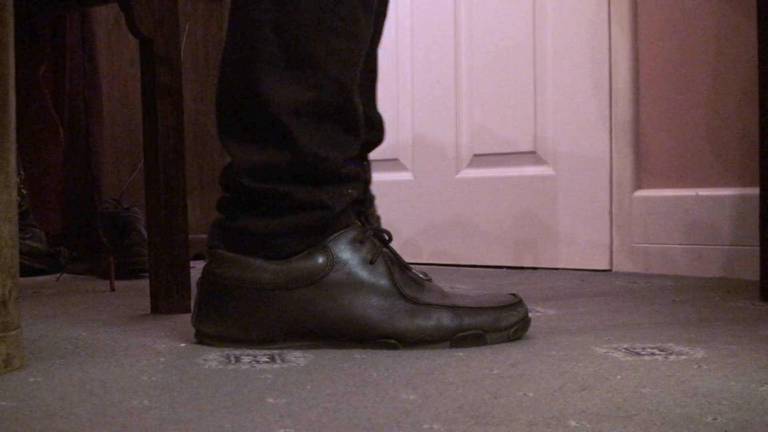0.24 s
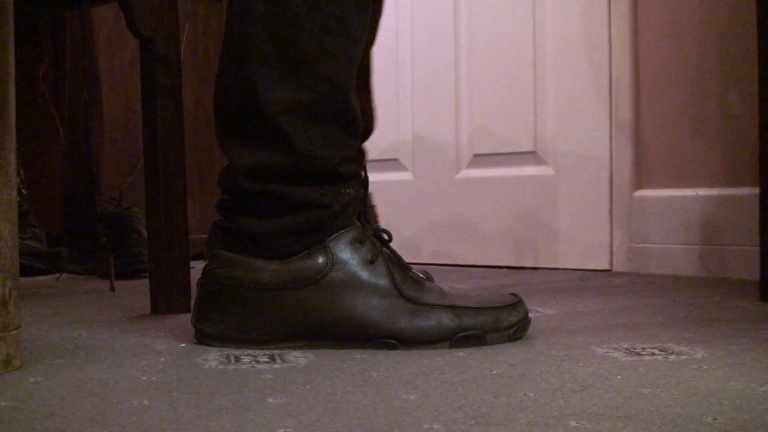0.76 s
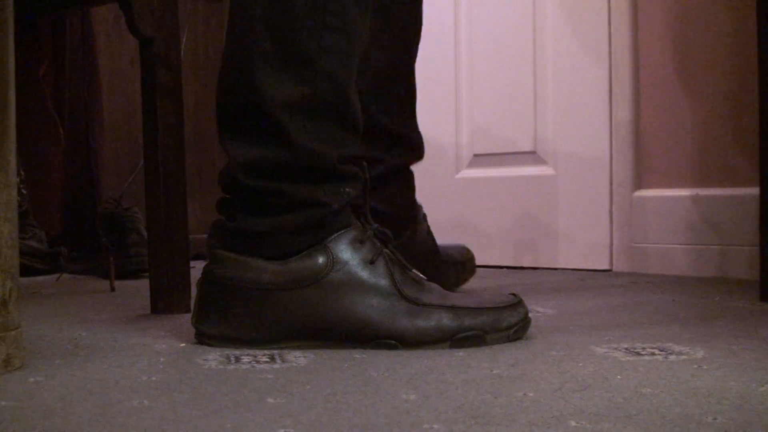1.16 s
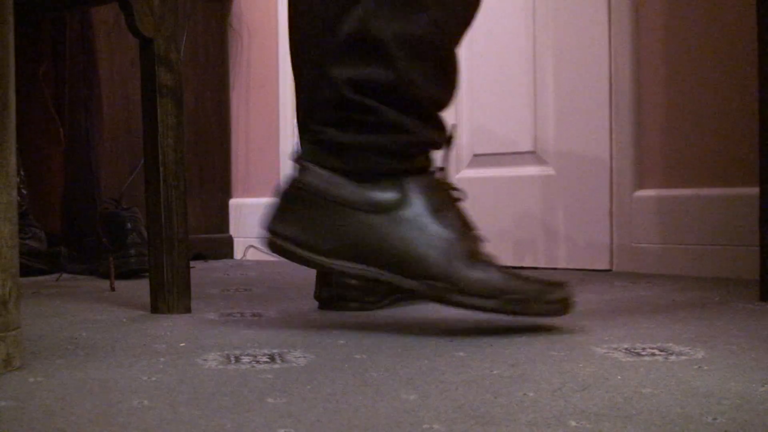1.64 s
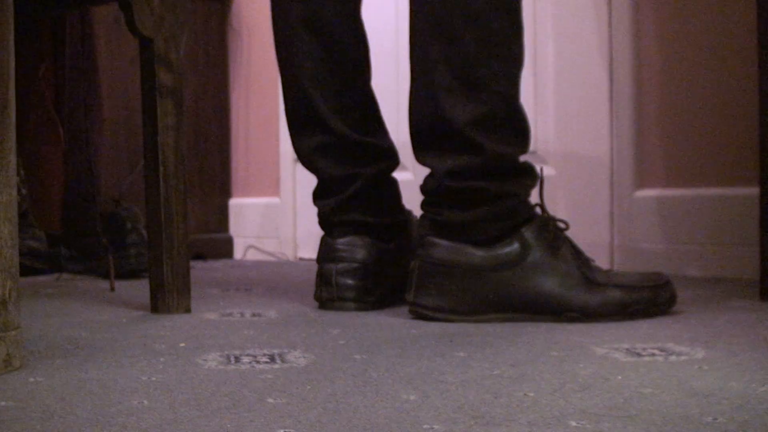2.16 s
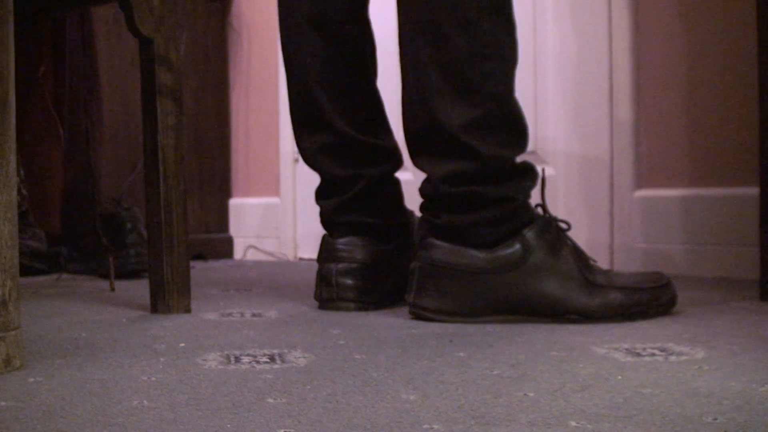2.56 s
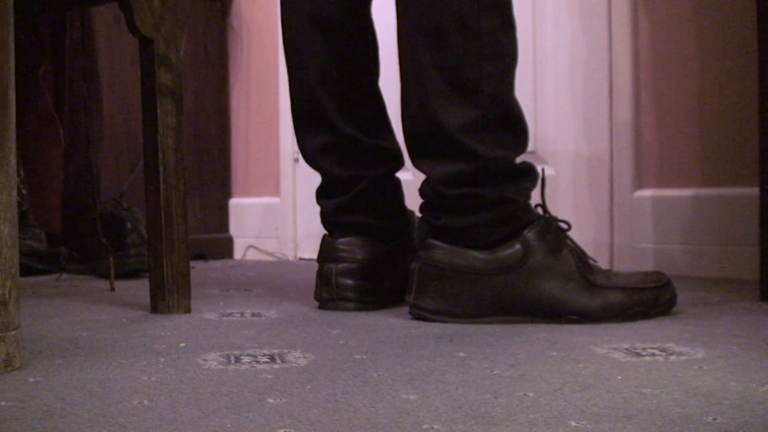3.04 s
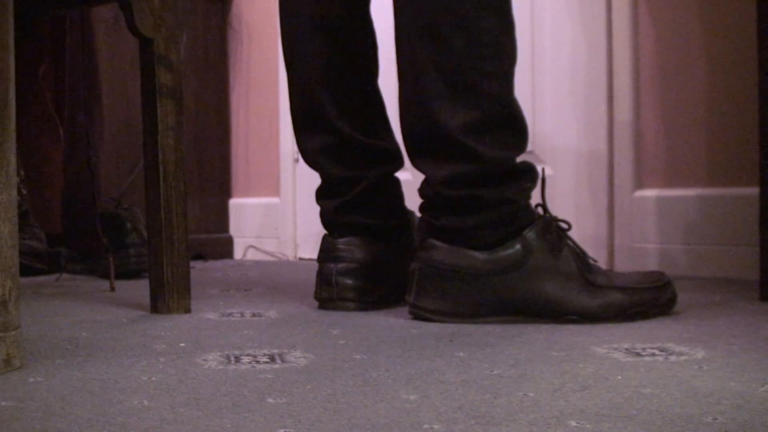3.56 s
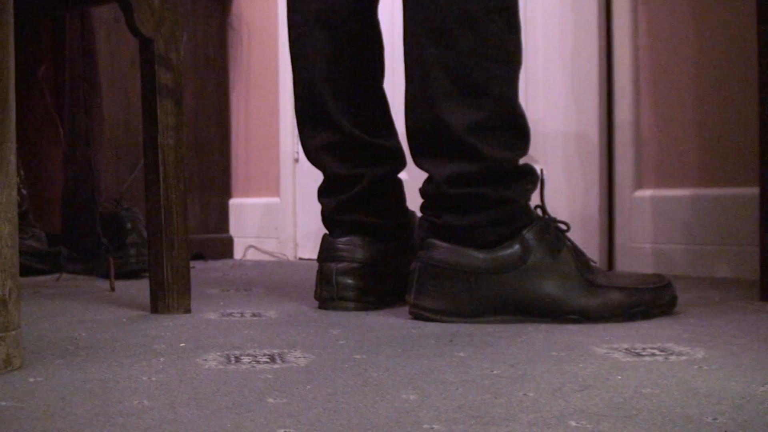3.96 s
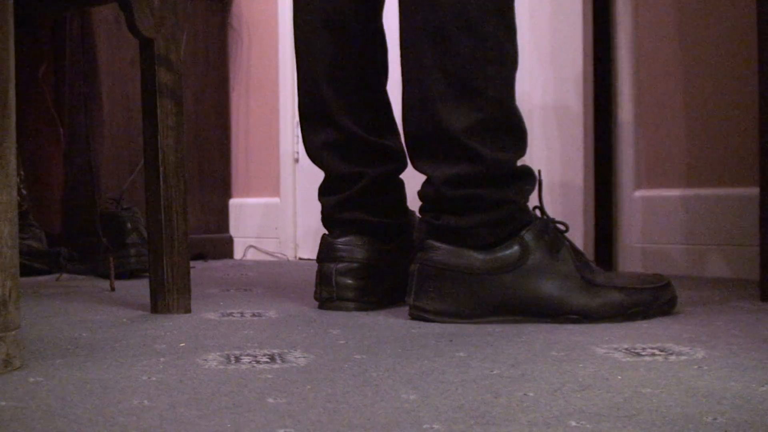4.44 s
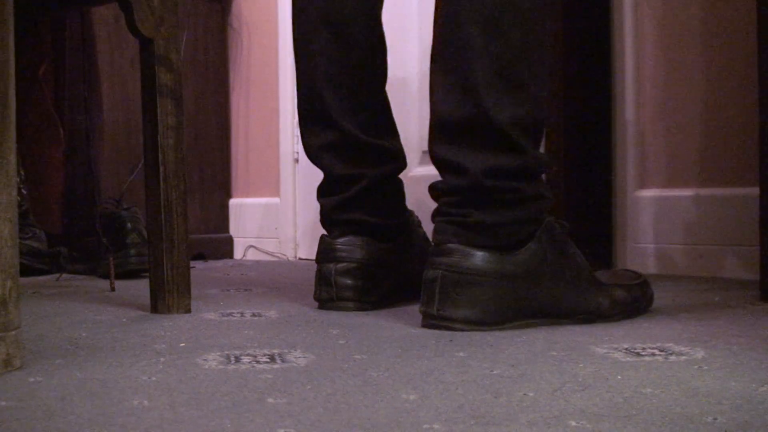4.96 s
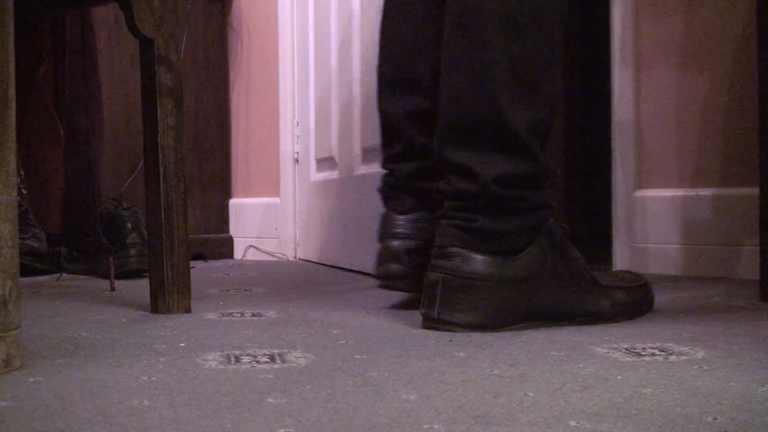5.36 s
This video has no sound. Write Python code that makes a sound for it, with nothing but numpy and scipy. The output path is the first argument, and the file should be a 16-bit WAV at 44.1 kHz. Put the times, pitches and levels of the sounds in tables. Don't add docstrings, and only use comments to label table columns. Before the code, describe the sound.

In a small carpeted room, muffled footsteps shuffle, a door handle rattles lightly, and the latch releases with a hard, hollow double knock.

```python
import sys
import numpy as np
from scipy import signal
from scipy.fft import rfft, irfft
from scipy.io import wavfile
from scipy.ndimage import uniform_filter1d

SR = 44100
rng = np.random.default_rng(int(sys.argv[2]) if len(sys.argv) > 2 else 0)


def file_out(sig):
    cols = np.atleast_2d(sig).T
    lim = np.clip(cols, -1, 1)
    pcm = np.round(lim * 32767).astype(np.int16)
    wavfile.write(sys.argv[1], SR, pcm)


def gain_from_decibels(decibels):
    exponent = np.asarray(decibels, float) / 20
    return 10 ** exponent


N = 246519

# frequency in Hz, density in dB per Hz.
AIR_COLOUR = [(12, -51), (20, -4.5), (96, -6.5), (120, -4.5), (150, -11), (222, -9.5), (367, -13.5),
              (527, -18.5), (574, -15), (642, -16.5), (1290, -23), (2080, -25), (2260, -24.5),
              (5230, -26.5), (16000, -31)]
# frequency in Hz, level in dB rms.
MOTOR_LINES = [(150.7, -67.5), (1803, -80.5), (2099, -76), (2401, -84), (3095, -81), (4199, -85.5),
               (4802, -81), (5399, -82)]
# octave centre in Hz, t60 in seconds.
ROOM_T60 = [(60, 0.42), (250, 0.42), (800, 0.34), (2500, 0.24), (6000, 0.18), (14000, 0.1)]
# frequency in Hz, level in dB.
ROOM_TILT_DB = [(20, -7.5), (400, -5.5), (1000, -6.5), (1800, -1), (21000, 1)]
AIR_DB, ROOM_DB = -57, -6.5

# strongest drag in seconds, level in dB, rise in seconds,
# fall in seconds, fibre hiss in relative dB.
SOLE_DRAGS = [(.12, -58.5, .03, 0.1, -4), (.204, -39, 0.024, 0.082, -12), (.425, -51, 0.14, 0.12, 0),
              (.622, -59.5, .16, 0.27, -4.5), (.92, -56.5, .07, 0.18, -3.5), (1.2, -58.5, 0.035, 0.34, -12),
              (1.34, -64, .03, 0.28, -6), (1.41, -55.5, .15, .15, -10), (1.48, -55, .15, 0.18, -10),
              (1.626, -60.5, 0.29, 0.021, 2.5), (1.864, -51, 0.014, 0.11, -3.5),
              (4.548, -57.5, .25, 0.13, -27), (4.7, -53.5, .01, 0.12, -5), (4.79, -50, .07, 0.15, -2),
              (4.865, -54, .2, .09, 4.5), (5.262, -64, .08, .07, 6), (5.232, -55, 0.19, 0.078, -6)]
# start in seconds, thud peak in dB, slap in relative dB, contact in ms.
FOOTFALLS = [
    (0.19, -37, -20, 3.4),
    (0.2, -31, -11.5, 4.6),
    (0.212, -43, 2, 2.1),
    (1.342, -43.5, -11, 0.93),
    (1.479, -49, -8, 2.5),
    (1.862, -40, -1.5, 2.7),
    (1.875, -53, 9.5, 1.5),
    (1.91, -44.5, -10, 3.4),
    (1.924, -43, -13, 1.2),
    (2.24, -45, -15, 1.8),
]
# frequency in Hz, density in dB per Hz.
THUD_COLOUR = [(40, -3), (90, -2), (300, 0.5), (600, 3.5), (1000, -7.5), (1500, -11), (2500, -39)]
# frequency in Hz, density in dB per Hz.
FIBRE_COLOUR = [(900, -11), (1500, 0.5), (2500, -4), (4000, -8), (6000, -19), (7500, -32)]
# start in seconds, peak in dB, frequency in Hz, t60 in seconds.
FLEXES = [(.19, -28.5, 334, 0.049), (.195, -42.5, 96.5, 0.3), (1.905, -39, 104, 0.092),
          (1.341, -41, 810, 0.024), (2.24, -46.5, 111, 0.41), (2.275, -49, 770, .15),
          (2.364, -41, 896, .03), (2.93, -44.5, 45.3, 0.37), (3.02, -48, 45, 0.51),
          (3.243, -30.5, 36, 0.17), (3.318, -43, 45, 0.19), (3.762, -42.5, 830, 0.049),
          (3.785, -45, 255, .15), (3.845, -36, 780, 0.16), (4.03, -42, 1000, .07), (3.833, -32, 910, 0.09),
          (3.905, -38, 440, 0.08), (4.051, -35, 677, .09), (4.114, -16, 557.4, 0.14),
          (4.115, -22.5, 455, 0.12), (4.262, -36, 960, .2), (4.242, -27, 781, 0.13),
          (4.236, -34.5, 429.7, .2), (4.115, -25, 112, 0.18), (4.127, -24, 203, 0.11),
          (4.236, -28, 558, .11), (4.1285, -38, 28, 0.54), (4.135, -35, 43.3, 1.17),
          (4.128, -38, 72.7, 0.59)]
DROP_DB = 30
FLOOR_BOOM_DB, FLOOR_SLOWER = -9, 1.7

# strongest rub in seconds, level in dB, rise in seconds,
# fall in seconds, rasp in relative dB.
HANDLE_RUBS = [(2.192, -49, 0.047, .45, -9), (2.366, -61, 0.016, 0.44, -15), (2.478, -51.5, 0.036, .6, -16),
               (2.7, -54.5, 1, 1.2, -7), (2.97, -54, .8, .3, 1), (3.022, -45.5, .05, .09, -14),
               (3.11, -51.5, 0.63, 0.21, 3.5), (3.38, -61.5, 0.41, 0.017, -14),
               (3.794, -54, 0.25, 0.36, -10), (3.852, -40.5, 0.15, .17, -5.5),
               (3.978, -43.5, .015, 0.071, -5), (4.064, -57.5, 0.14, .1, -22), (4.1, -39, 0.11, .025, -4)]
# frequency in Hz, density in dB per Hz.
RUSTLE_COLOUR = [(250, -1.5), (400, -3.5), (750, 2), (950, -4), (1300, -19), (1700, -40)]
# frequency in Hz, density in dB per Hz.
RASP_COLOUR = [(900, -29), (1250, 5), (1900, 2), (2500, -18), (4000, -7.5), (6000, -25), (8000, -13)]
# start in seconds, peak in dB, ring in Hz, door in relative dB.
DRY_TICKS = [(2.18, -40, 2740, -15), (2.3664, -44, 1000, -6), (2.4728, -35.5, 3610, -13),
             (2.8719, -39.5, 3030, -3.5), (2.9507, -40.5, 2420, 0.5), (2.9808, -40, 3900, -12),
             (3.0129, -31, 3080, -13), (3.019, -39, 6500, -7.5), (3.038, -30.5, 3900, -18),
             (3.0874, -41, 2520, -1), (3.083, -38, 6500, -12), (3.121, -33.5, 3200, -9),
             (3.2844, -54, 1300, 3), (3.3444, -63, 1300, -4), (3.3744, -53.5, 1280, -3),
             (3.7589, -43, 2640, -1), (3.8098, -41, 3500, -8), (3.81, -44, 5100, -14),
             (3.831, -39, 5200, -24), (3.8444, -37, 2920, -22), (3.8312, -35, 2020, -8),
             (3.918, -43, 2980, -1), (3.9419, -39, 2880, -8), (3.9752, -35, 2720, -7),
             (4.0277, -40, 3600, -3), (4.1122, -13, 2370, -32), (4.6955, -43.5, 3240, -6)]
# start in seconds, peak in dB, ring in Hz, door in relative dB.
FREE_TICKS = [
    (2.2194, -50, 1100, -6),
    (2.2794, -50.5, 3140, -1.5),
    (2.5653, -43, 3220, -9),
    (2.6344, -56, 1250, -1),
    (2.7175, -44, 3270, -1),
    (2.8784, -43.5, 3450, -4),
    (3.7844, -53, 3320, -5),
    (3.1198, -33, 7500, -5),
    (3.126, -34, 6900, -5.5),
    (4.0514, -44, 2855, 0),
]
# start in seconds, peak in dB, ring in Hz, contact in ms.
LOOSE_PARTS = [(2.185, -48, 4050, 9), (2.386, -52, 3080, 6.8), (2.477, -45, 2310, 7.2),
               (3.045, -37, 4200, 10), (3.065, -44, 4540, 17), (3.083, -44, 2420, 6.4),
               (3.135, -47, 7500, 12), (3.85, -37.5, 3300, 11), (4.037, -40, 3550, 15),
               (4.081, -40, 4360, 19), (4.697, -44, 7440, 5.4)]
# time in seconds, slip rate in Hz, level in dB.
SQUEAK_CURVES = [
    [(3.039, 2084, -50), (3.046, 2168, -34), (3.053, 2465, -33), (3.0545, 2500, -56)],
    [(3.057, 2480, -48), (3.061, 2450, -33), (3.067, 2420, -41), (3.082, 2350, -66)],
    [(4.074, 2110, -65), (4.078, 2270, -47), (4.083, 2970, -42), (4.091, 3200, -32), (4.097, 3220, -42),
     (4.105, 3250, -70)],
]
SQUEAK_BITE = [
    -3,
    -15,
    -12,
]
# multiple of slip rate, level in dB.
SLIP_OVERTONES = [(1.9, -22), (2.85, -10.5)]
PANEL_BOOM_DB, PANEL_SLOWER = -2, 1.32
TICK_MS, TICK_RING_DB, PING_MS, PING_RING_DB = 3, -17, 2, -6
RATTLE_DOOR_DB, RATTLE_RING_DB = -6, -9

# start in seconds, peak in dB, start in Hz, climb in Hz per s, length in seconds.
LEAF_SPRINGS = [
    (2.232, -45, 230, 12000, .05),
    (3.827, -28, 670, 3000, .05),
    (3.912, -43, 760, 1200, .05),
    (4.112, -8, 630, 3700, .05),
    (4.158, -21, 710, 5400, .034),
]
SPRING_RISE_S, SPRING_FADE_DB = .012, 25
LONE_MODE_ECHO = .4
# start in seconds, peak in dB, ring in Hz, contact in ms.
LETTING_GO = [(2.3138, -52, 2500, 1), (2.38, -52, 2600, 1), (2.477, -50, 7000, 1), (2.684, -52, 2200, .8),
              (2.712, -53, 2500, 1), (2.872, -48, 6700, 1.2), (2.879, -50, 7400, 1.2),
              (2.985, -50, 6500, 1.5), (3.0128, -32, 5300, 1.5), (3.815, -45, 6200, 1.5),
              (4.0351, -41, 2900, 4), (3.836, -42, 1950, 8), (4.086, -44, 6200, 8), (3.03, -44, 1300, 10),
              (3.052, -42, 4300, 8), (4.255, -36, 1300, 25), (4.2385, -20, 4500, 2), (4.23, -32, 3000, 1.5),
              (4.7718, -48, 2400, 2), (4.784, -46, 800, 2), (4.792, -46, 1100, 2), (4.803, -47, 900, 2),
              (4.813, -47, 1200, 2), (4.8345, -41, 1000, 2), (4.836, -47, 2800, 1.5)]
SNAP_DOOR_DB, SNAP_RING_DB = -14, -16
# start in seconds, peak in dB, frequency in Hz, t60 in seconds.
SMALL_PARTS = [(2.878, -51, 3270, .1), (2.728, -52, 3270, .05), (3.043, -42, 6600, .05),
               (3.049, -38, 6380, .05), (3.059, -44, 6600, .05), (3.083, -47, 6300, .05),
               (3.072, -47, 2420, .04), (3.088, -47, 2400, .03), (3.135, -42, 790, .1),
               (4.118, -29, 1450, .14), (4.113, -28, 1830, .1), (4.125, -28, 1550, .12),
               (4.12, -32, 1717, .18), (4.116, -28, 860, .1), (4.234, -32, 1270, .06),
               (4.2345, -22, 904, .07), (3.866, -40, 800, .1), (3.762, -45, 1500, .04),
               (4.245, -36, 1190, .08), (4.275, -38, 880, .2)]
CHIME_RISE_S = .0015

# start in seconds, crack in dB, door in dB, panel in dB, rattle in ms.
LATCH_BLOWS = [
    (4.1025, -17, -28, -35, 30),
    (4.1123, -16, -24, -24.5, 5.7),
    (4.117, -11, -22, -22.5, 3.5),
    (4.125, -17.5, -22, -23, 2.7),
    (4.131, -26, -31, -30, 4.4),
    (4.138, -26, -33, -53, 5.2),
    (4.227, -31, -52, -55, 4.8),
    (4.2322, -11.5, -29, -49, 3.4),
    (4.238, -23, -28, -42, 30.5),
    (4.248, -36, -30, -50, 8.6),
]
# frequency in Hz, density in dB per Hz.
CRACK_COLOUR = [(710, -25), (1200, -6), (1470, -6), (2300, -13), (2800, -9), (4200, -7), (6440, -10.5),
                (15500, -31)]
# frequency in Hz, density in dB per Hz.
STRIKE_COLOUR = [(710, -14), (1200, -8), (2000, -8), (2700, -12), (4100, -4), (6500, -9), (8500, -11),
                 (15500, -36)]
# frequency in Hz, density in dB per Hz.
HOLLOW_COLOUR = [(330, -23), (450, -3), (750, 13), (920, -9.5), (1150, 0), (1600, -23)]
# frequency in Hz, level in dB, t60 in seconds.
DOOR_MODES = [(430, -7, .09), (464, -6, .09), (510, -9, .06), (556, -2, .07), (640, -3, .06),
              (711, -1, .07), (781, 0, .09), (850, -5, .06), (890, -4, .06), (1020, -11, .06),
              (1168, -12, .05), (1545, -16, .04)]
# frequency in Hz, level in dB, t60 in seconds.
PANEL_MODES = [(98, -2, .17), (113, -3, .14), (135, -6, .09), (171, -4, .1), (203, 0, .11), (225, -3, .09),
               (255, -4, .09)]
BOLT_S = 4.2
CEILING, TOP_HZ = 0.55, 15750


def shaped(x, points):
    hz, db = np.transpose(points)
    log_hz = np.log(np.arange(len(x) // 2 + 1) * SR / len(x) + 1)
    gain_db = np.interp(log_hz, np.log(hz), db, left=-90, right=-90)
    return irfft(rfft(x) * gain_from_decibels(gain_db), len(x))


def response(points):
    hz, db = np.transpose(points)
    log_hz = np.log(np.arange(1025) * SR / 2048 + 1)
    gain_db = np.interp(log_hz, np.log(hz), db, left=db[0] - 25, right=db[-1] - 20)
    cepstrum = irfft(np.log(gain_from_decibels(gain_db)))
    cepstrum[1:1024] *= 2
    cepstrum[1025:] = 0
    return irfft(np.exp(rfft(cepstrum)))


def unit(x):
    return x / np.sqrt(np.mean(x ** 2))


def peak(x):
    return x / np.abs(x).max()


def struck(contact, body):
    return peak(signal.fftconvolve(contact, body))


def add(out, s, x):
    i = int(s * SR)
    out[i:i + len(x)] += x[:N - i]


def burst(ms):
    t = np.arange(4096) / SR
    return rng.standard_normal(4096) * np.exp(-t * 1000 / ms) * np.minimum(t / 0.00052, 1)


def grit(spread_db, rate_hz):
    hold = int(SR / rate_hz)
    snags = gain_from_decibels(spread_db * np.minimum(rng.standard_exponential(N // hold + 1), 2.2))
    return uniform_filter1d(np.repeat(snags, hold)[:N], hold) * rng.standard_normal(N)


def friction(rows, low, mid, high, low_db, slower):
    t = np.arange(0, N + 32, 32) / SR
    power = np.zeros((3, len(t)))
    for s, db, rise_s, fall_s, high_db in rows:
        away_db = DROP_DB * np.maximum((s - t) / max(rise_s, .003), (t - s) / max(fall_s, .003))
        levels_db = [db + low_db - away_db / slower, db - away_db, db + high_db - away_db]
        power += gain_from_decibels(levels_db) ** 2
    out = np.zeros(N)
    for band_power, texture in zip(power, (low, mid, high)):
        out += np.interp(np.arange(N) / SR, t, np.sqrt(band_power)) * unit(texture)
    return out


def lone_mode(db, hz, t60_s, rise_s, seconds):
    t = np.arange(int(seconds * SR)) / SR
    return gain_from_decibels(db - 60 * t / t60_s) * np.minimum(t / rise_s, 1) * np.sin(2 * np.pi * hz * t)


def ring(modes, scatter_db, seconds=.3):
    t = np.arange(int(seconds * SR)) / SR
    hz, db, t60_s = np.transpose(modes)[:, :, None]
    db = db + scatter_db * rng.standard_normal(hz.shape)
    hz = hz * (1 + .015 * rng.standard_normal(hz.shape))
    start_rad = .25 * scatter_db * rng.standard_normal(hz.shape)
    rise = np.minimum(t * hz, 1)
    waves = rise * gain_from_decibels(db - 60 * t / t60_s) * np.sin(2 * np.pi * hz * t + start_rad)
    return peak(np.sum(waves, axis=0))


def tick(out, s, db, hz, door_db, ring_db, ms):
    contact = burst(max(ms, .5))
    colour = [(500, -22), (.5 * hz, -5), (hz, 0), (1.17 * hz, -7), (1.6 * hz, -16), (16000, -42)]
    metal = [(hz, 0, .025), (1.06 * hz, -4, .02)]
    add(out, s, gain_from_decibels(db) * struck(contact, response(colour)))
    add(out, s, gain_from_decibels(db + ring_db) * struck(contact, ring(metal, 0)))
    add(out, s, gain_from_decibels(db + door_db) * struck(contact, ring(DOOR_MODES, 4.5)))


def air():
    t = np.arange(N) / SR
    out = gain_from_decibels(AIR_DB) * unit(shaped(rng.standard_normal(N), AIR_COLOUR))
    for hz, db in MOTOR_LINES:
        wander = unit(uniform_filter1d(rng.standard_normal(N), 2000))
        drift_cycles = np.cumsum(wander) * 13 / SR
        out += gain_from_decibels(db) * np.sqrt(2) * np.sin(2 * np.pi * (hz * t + drift_cycles))
    return out


def room():
    t = np.arange(SR // 2) / SR
    tail = np.zeros(len(t))
    for hz, t60_s in ROOM_T60:
        octave = shaped(rng.standard_normal(len(t)), [(hz / 4, -25), (hz, 0), (hz * 3, -25)])
        tail += gain_from_decibels(-60 * t / t60_s) * unit(octave) * np.sqrt(hz)
    power = np.abs(rfft(tail)) ** 2
    even = np.sqrt(uniform_filter1d(power, size=300) / uniform_filter1d(power, size=30))
    tail = shaped(irfft(rfft(tail) * even, len(t)), ROOM_TILT_DB)
    tail *= np.clip(t / 0.0023 - 1, 0, 1) * np.clip(10 * (t[-1] - t), 0, 1) ** 2
    return gain_from_decibels(ROOM_DB) * tail / np.sqrt(np.sum(tail ** 2))


def shoes():
    pile = grit(3.2, 150)
    boom = shaped(grit(1.5, 53), [(50, -37), (90, 0.5), (260, 6.0), (380, -22)])
    scuff = shaped(pile, [(220, -19), (350, -0.5), (800, 0), (1200, -12), (1600, -17.5)])
    hiss = shaped(pile, FIBRE_COLOUR)
    out = gain_from_decibels(-1.5) * friction(SOLE_DRAGS, boom, scuff, hiss, FLOOR_BOOM_DB, FLOOR_SLOWER)
    for s, db, slap_db, ms in FOOTFALLS:
        contact = burst(4 * ms)
        thud = struck(contact, response(THUD_COLOUR))
        slap = struck(contact, response(FIBRE_COLOUR))
        add(out, s, gain_from_decibels(db) * (thud + gain_from_decibels(slap_db) * slap))
    return out


def sway():
    out = np.zeros(N)
    for s, db, hz, t60_s in FLEXES:
        add(out, s, lone_mode(db, hz, t60_s, 1 / min(hz, 150), 1))
    return out


def squeak(rows, bite_db):
    s, hz, db = np.transpose(rows)
    t = s[0] + np.arange(4096) / SR
    wobble = 1 + .045 * unit(uniform_filter1d(rng.standard_normal(4096), 40))
    phase = 2 * np.pi * np.cumsum(np.interp(t, s, hz) * wobble) / SR
    overtones = sum(gain_from_decibels(d) * np.sin(k * phase) for k, d in SLIP_OVERTONES)
    return gain_from_decibels(np.interp(t, s, db, right=-120)) * (np.sin(phase) + gain_from_decibels(bite_db) * overtones)


def handle():
    slips = grit(4.0, 200)
    boom = shaped(grit(1.7, 50), [(60, -8), (100, 4), (230, -1.5), (330, -18)])
    rustle, rasp = shaped(slips, RUSTLE_COLOUR), shaped(slips, RASP_COLOUR)
    out = gain_from_decibels(-4.5) * friction(HANDLE_RUBS, boom, rustle, rasp, PANEL_BOOM_DB, PANEL_SLOWER)
    for s, db, hz, door_db in DRY_TICKS:
        tick(out, s, db, hz, door_db, TICK_RING_DB, TICK_MS)
    for s, db, hz, door_db in FREE_TICKS:
        tick(out, s, db, hz, door_db, PING_RING_DB, PING_MS)
    for s, db, hz, ms in LOOSE_PARTS:
        tick(out, s, db, hz, RATTLE_DOOR_DB, RATTLE_RING_DB, ms)
    for rows, bite_db in zip(SQUEAK_CURVES, SQUEAK_BITE):
        add(out, rows[0][0], squeak(rows, bite_db))
    return out


def spring():
    out, t = np.zeros(N), np.arange(SR // 4) / SR
    for s, db, hz, climb, length_s in LEAF_SPRINGS:
        edges = np.clip(np.minimum(t / SPRING_RISE_S, (length_s - t) / .006), 0, 1)
        tone = np.sin(2 * np.pi * (hz * t + .5 * climb * t ** 2))
        add(out, s, edges * gain_from_decibels(db - SPRING_FADE_DB * t / length_s) * tone)
    return out


def snaps():
    out = np.zeros(N)
    for s, db, hz, ms in LETTING_GO:
        tick(out, s, db, hz, SNAP_DOOR_DB, SNAP_RING_DB, ms)
    return out


def chimes():
    out = np.zeros(N)
    for s, db, hz, t60_s in SMALL_PARTS:
        add(out, s, lone_mode(db, hz, t60_s, CHIME_RISE_S, .25))
    return out


def latch():
    out = np.zeros(N)
    for s, crack_db, door_db, panel_db, ms in LATCH_BLOWS:
        colour = CRACK_COLOUR if s < BOLT_S else STRIKE_COLOUR
        add(out, s, gain_from_decibels(crack_db) * struck(burst(ms), response(colour)))
        add(out, s, gain_from_decibels(door_db) * ring(DOOR_MODES, 3))
        add(out, s, gain_from_decibels(door_db - 5) * struck(burst(9.2), response(HOLLOW_COLOUR)))
        add(out, s, gain_from_decibels(panel_db) * ring(PANEL_MODES, 0))
    return out


def scene():
    bed, echo = air(), room()
    near = gain_from_decibels(-0.5) * (shoes() + handle() + latch()) + snaps()
    lone = sway() + spring() + chimes()
    wet = signal.fftconvolve(near + LONE_MODE_ECHO * lone, echo)[:N]
    return (near + lone + wet + bed)[None]


def band_limit(x):
    return signal.sosfilt(signal.butter(12, 16210, fs=SR, output="sos"), x)


def record(dry):
    rounded = CEILING * np.tanh(dry / CEILING)
    top_cut = signal.ellip(8, .2, 70, TOP_HZ, fs=SR, output="sos")
    mix = signal.sosfilt(top_cut, rounded)
    return band_limit(mix)


dry = scene()
out = record(dry)
file_out(out)
```